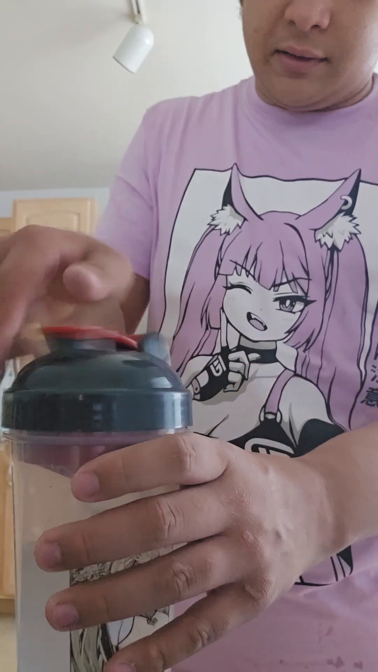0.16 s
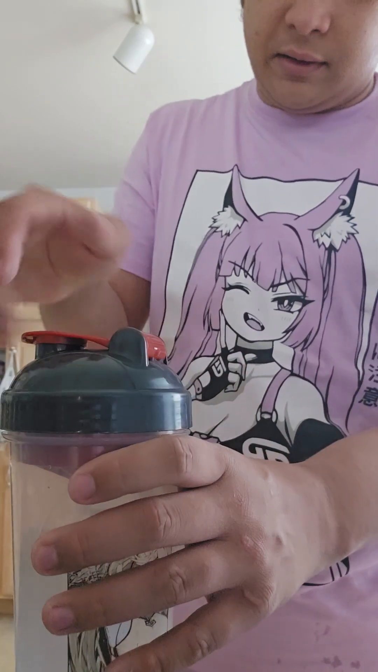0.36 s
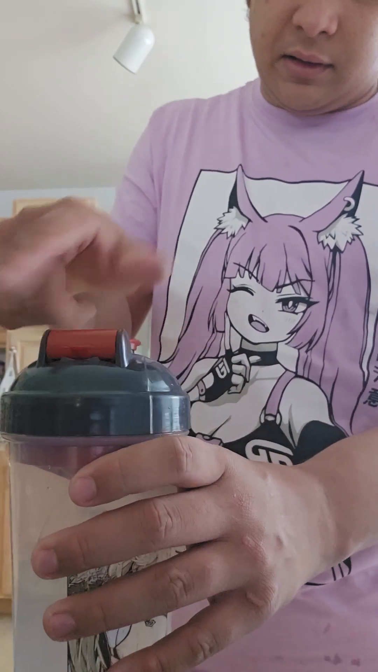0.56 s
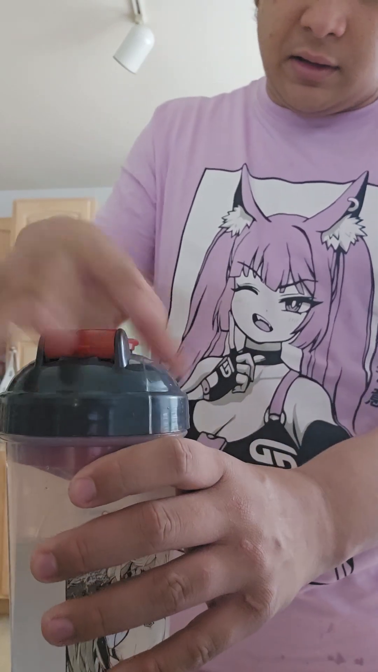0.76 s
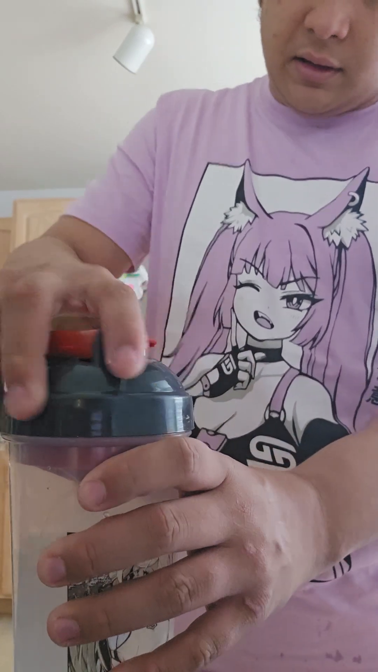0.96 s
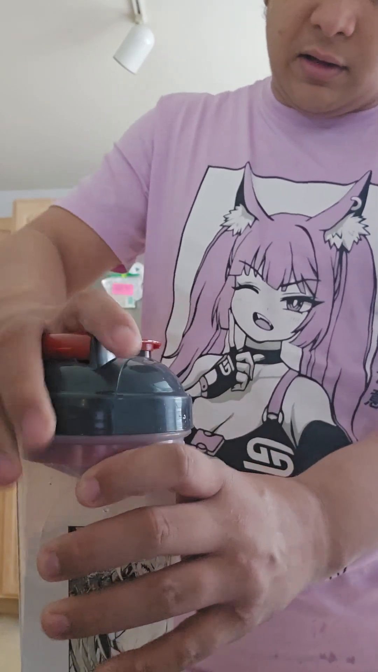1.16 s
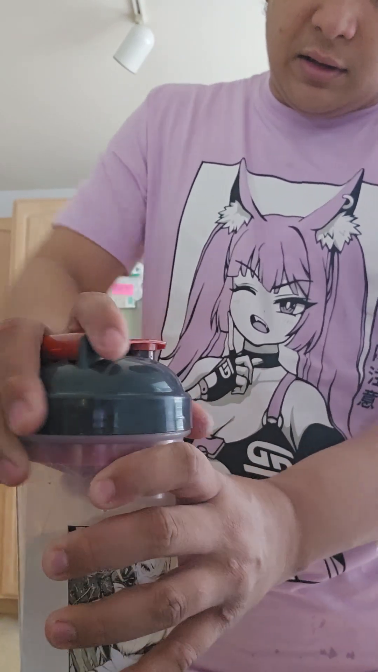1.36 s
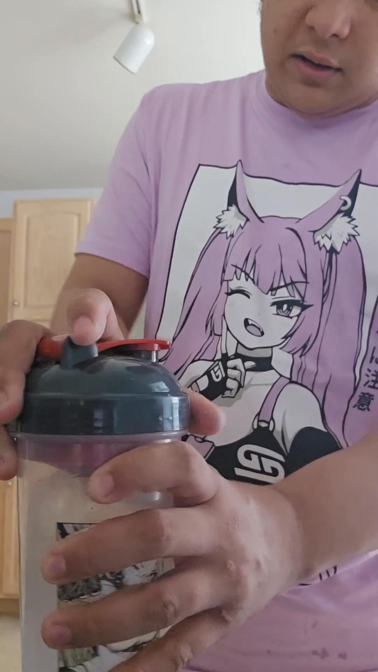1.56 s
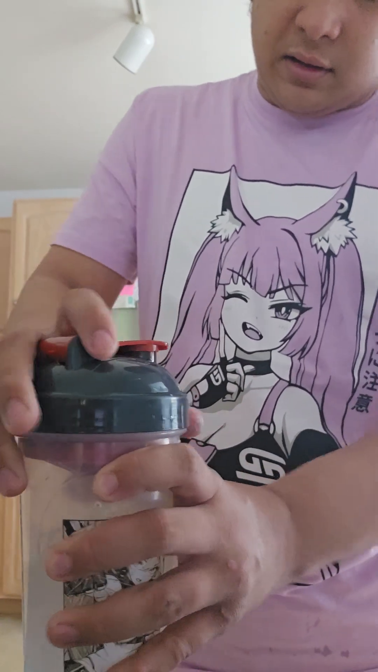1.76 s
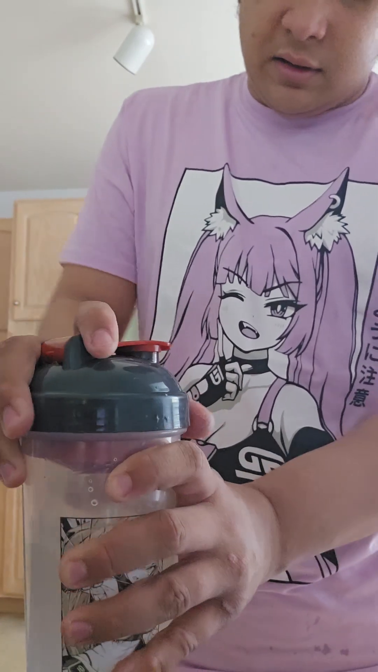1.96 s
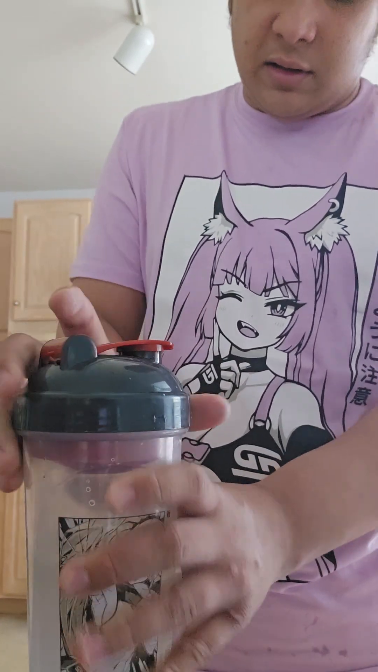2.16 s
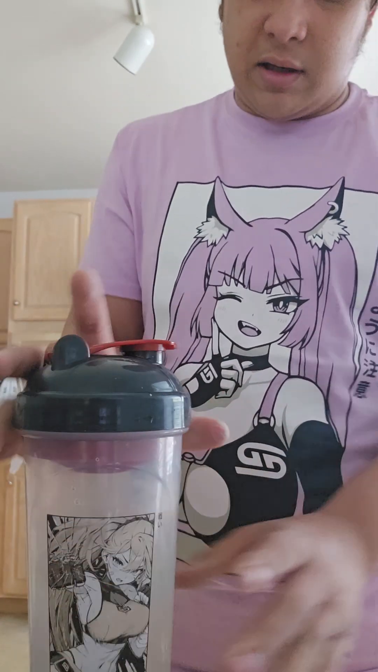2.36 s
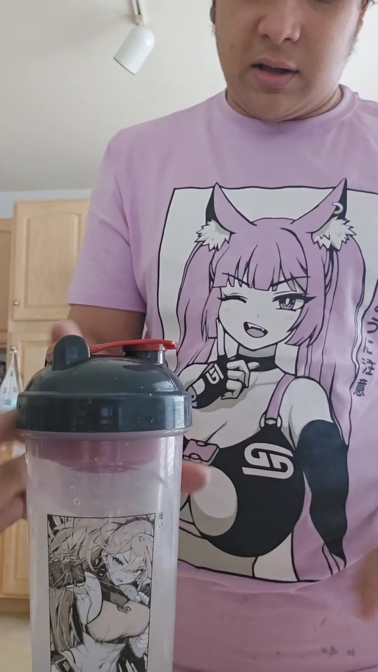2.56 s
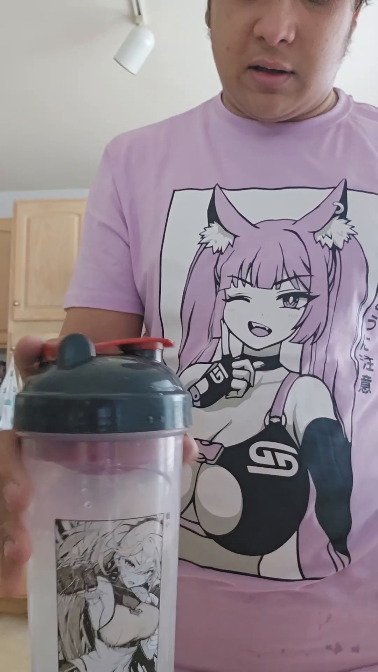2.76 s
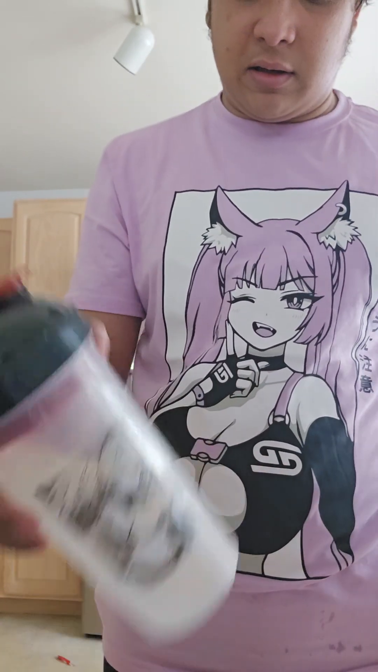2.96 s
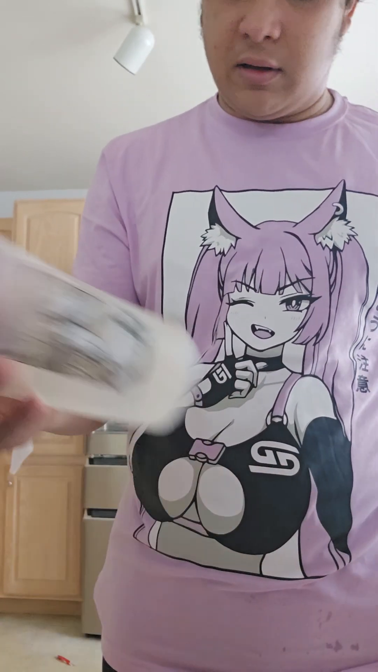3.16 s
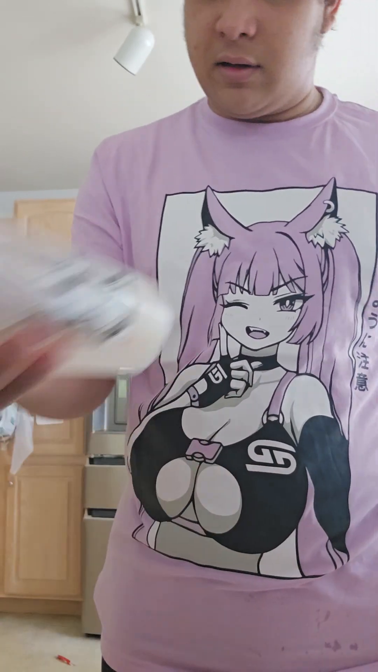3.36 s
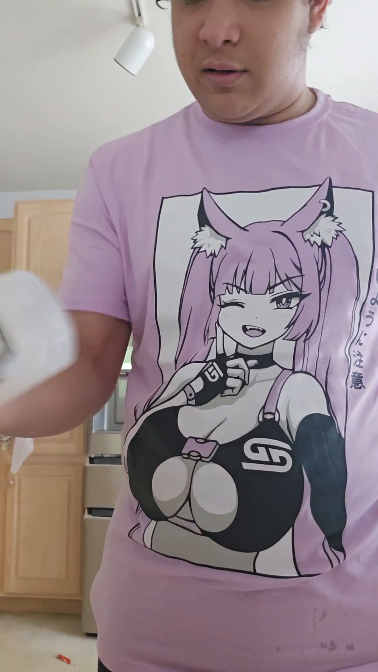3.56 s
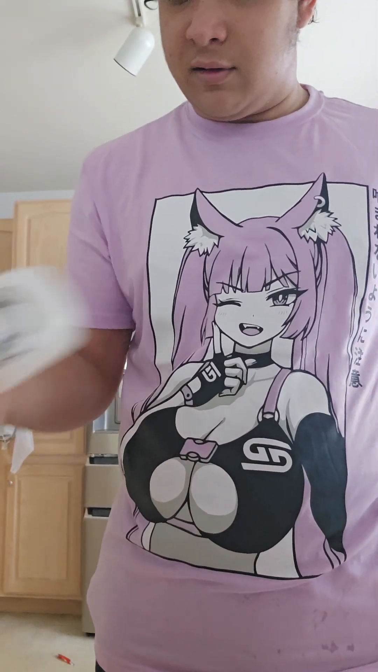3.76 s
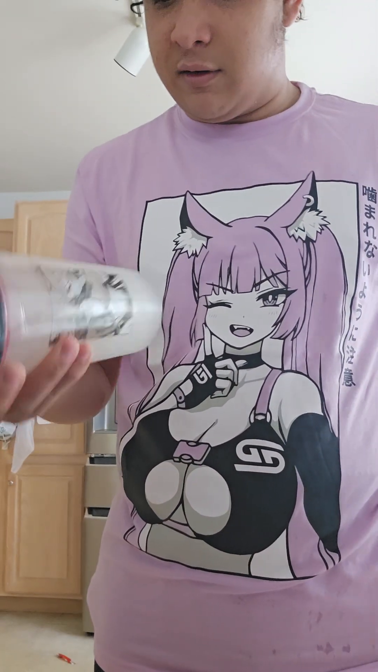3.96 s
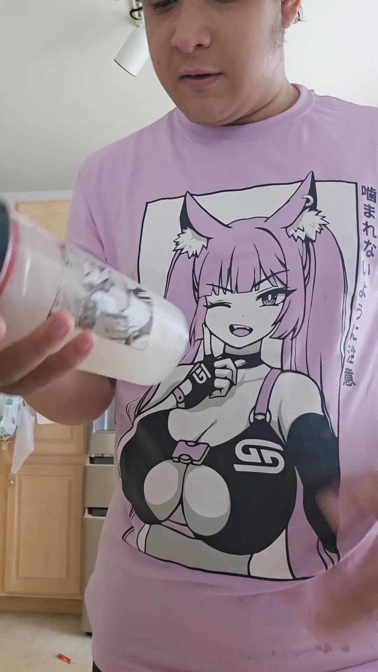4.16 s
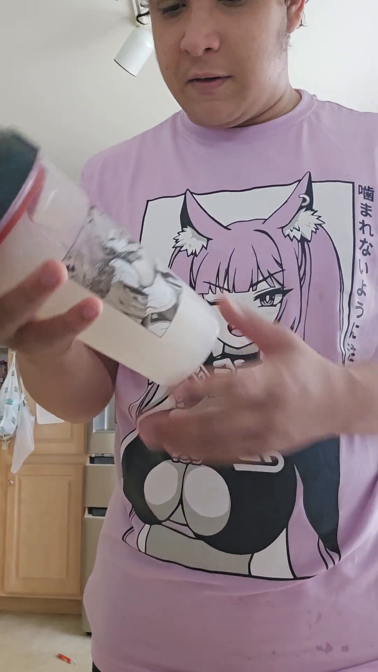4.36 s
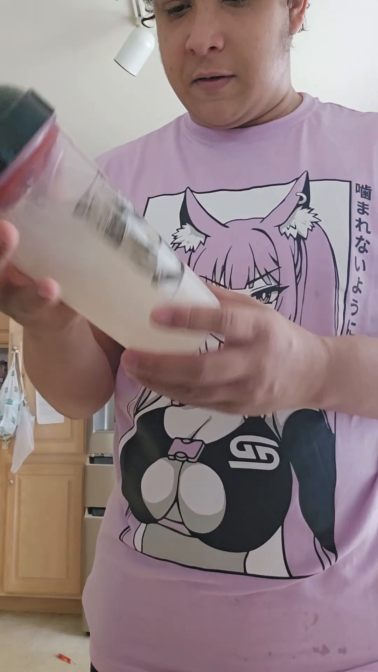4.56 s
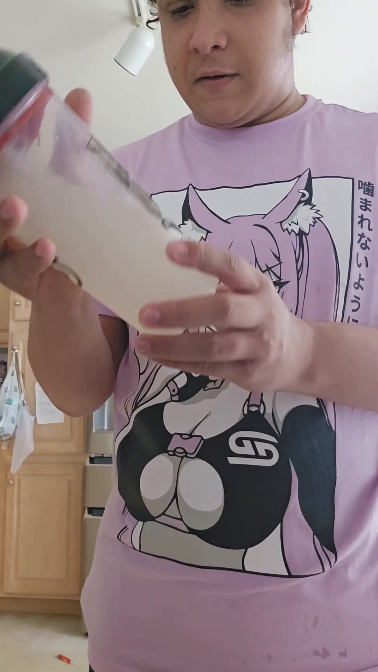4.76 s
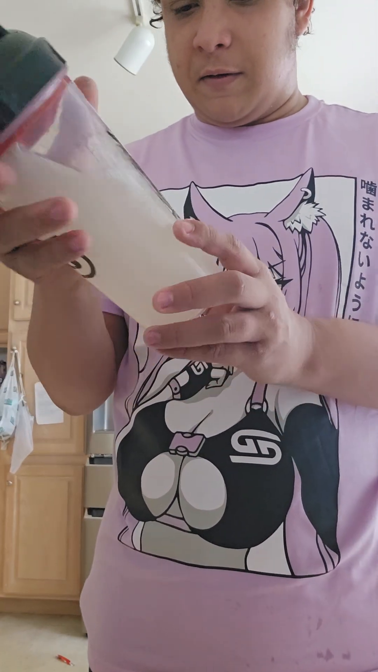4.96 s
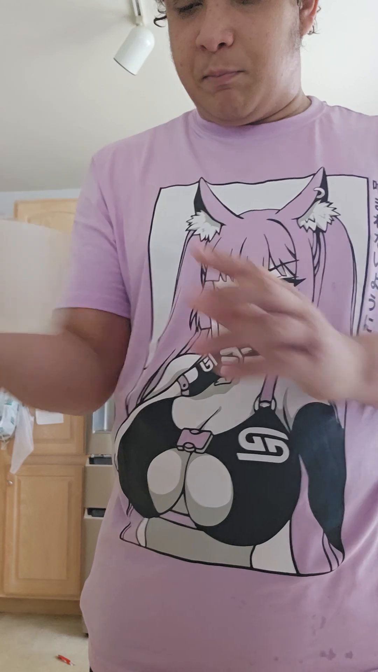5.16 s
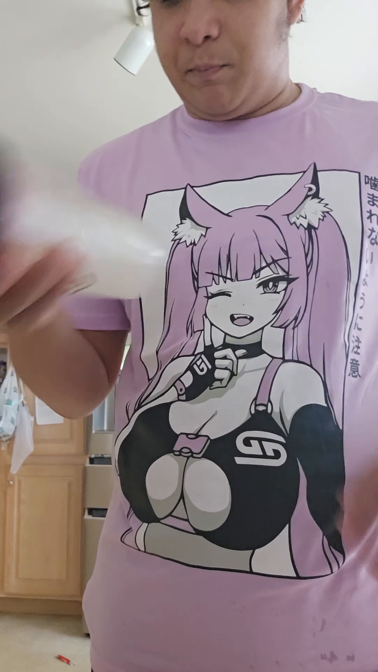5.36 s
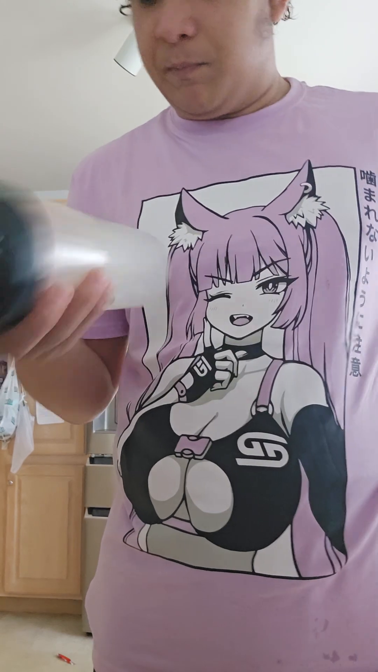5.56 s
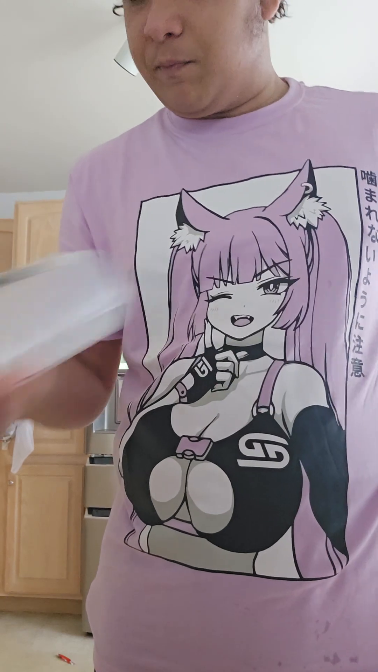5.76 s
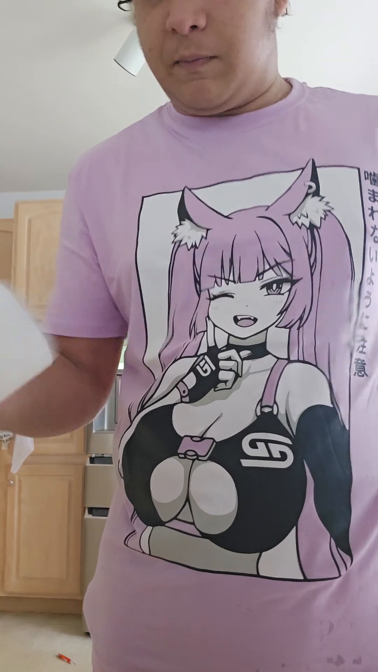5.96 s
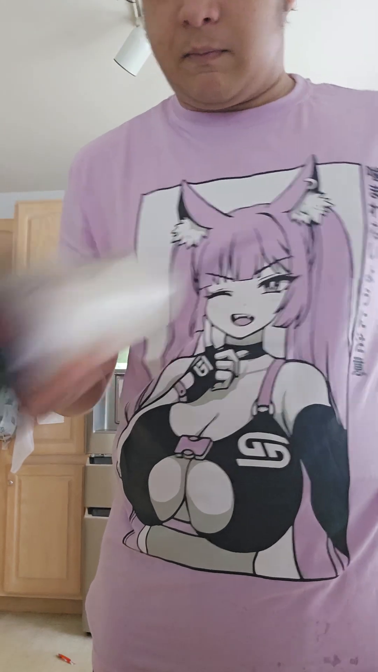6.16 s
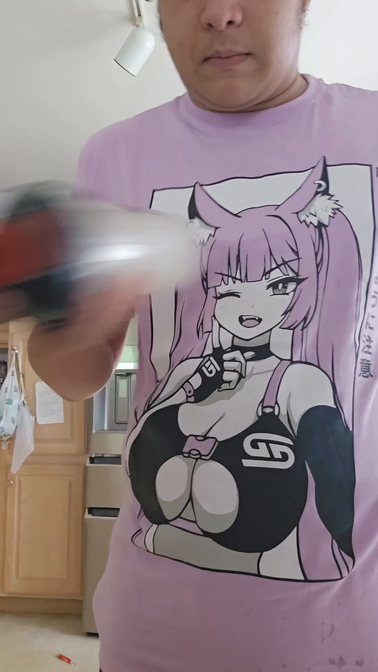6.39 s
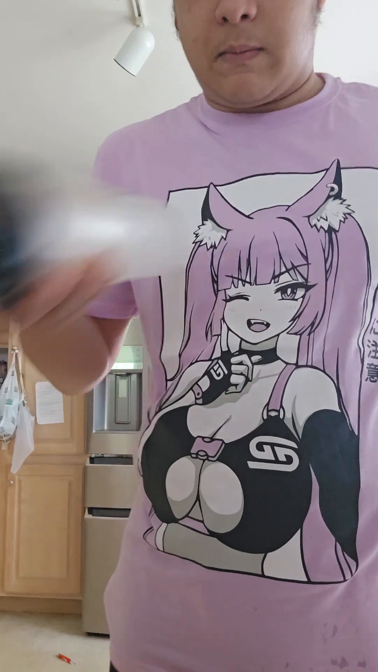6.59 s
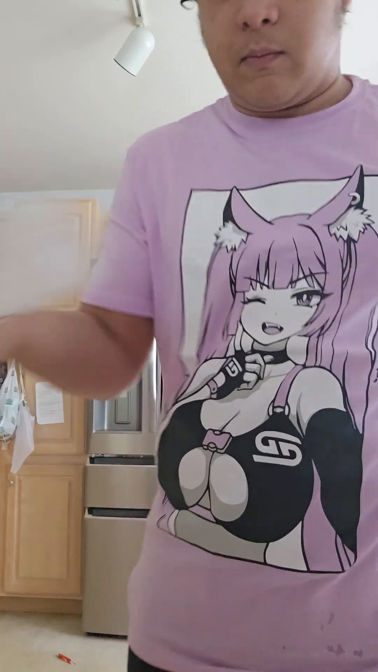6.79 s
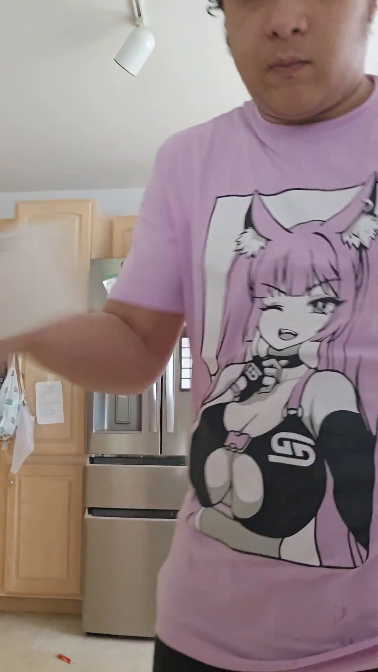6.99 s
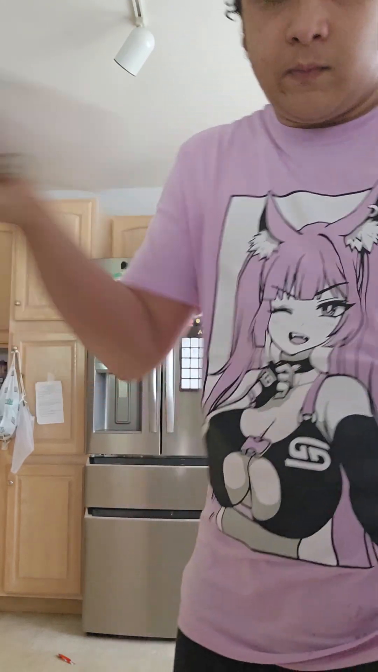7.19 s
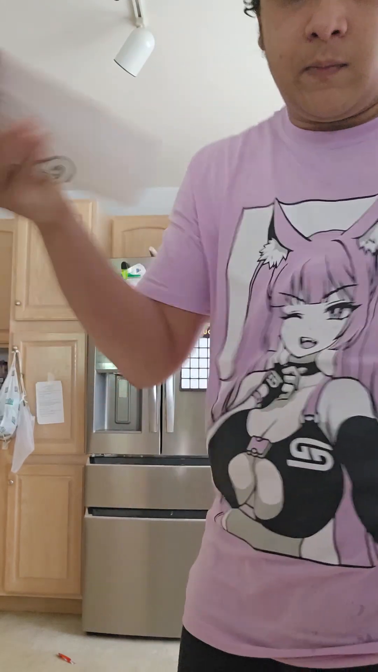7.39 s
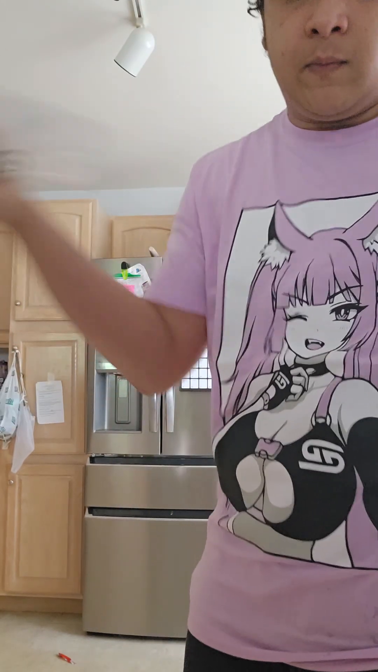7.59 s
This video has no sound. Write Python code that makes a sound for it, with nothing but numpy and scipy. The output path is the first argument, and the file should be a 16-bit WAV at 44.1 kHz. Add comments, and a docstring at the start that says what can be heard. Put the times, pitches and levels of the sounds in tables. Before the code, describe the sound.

Close and dry, with a short kitchen reflection and a barely audible hush. From 0 to 0.3 seconds, plastic lid ticks and scrapes quicken into a hollow clack with a low counter thud; the heaviest clack and thump land near 0.6. Softer knocks come around 0.95 to 1.2, then faint finger rubbing, a tap near 1.75 and small ticks around 2.0 to 2.4. It is almost silent until light taps near 3.2. At 3.4 a very sharp liquid slap opens a short shake, three or four bright, hissing splashes until about 4.2. The drink then drains with a fading, hollow fizz, with small taps at 4.3 and 4.5, nearly silent by 5.2. From 5.3 to the end near 7.6, hard shaking runs steadily, roughly four throws a second, each splash answered by a softer return slosh, with cracks and brief watery gurgles.

```python
"""On a kitchen counter, a plastic shaker cup gets its lid screwed on, then is lifted and shaken; two mic ports listen.
The lid rubs and ticks (noise, tiny slips, hollow resonances) and its jerks thump the counter (low decaying sines).
In the shaken cup the drink slaps the ends (noise bursts), splashes and fizzes (patchy noise, grains, cup resonances)
and gurgles (short tones). A room answer and a faint hush lie around it all."""
import sys
import numpy as np
from scipy import signal
from scipy.fft import rfft, irfft, next_fast_len
from scipy.io import wavfile
from scipy.ndimage import uniform_filter1d, map_coordinates

SR = 44100
rng = np.random.default_rng(int(sys.argv[2]) if len(sys.argv) > 2 else 0)


def generate_wav(signal):
    """Clip the signal to [-1, 1] and save it as 16-bit WAV at the path in sys.argv[1]."""
    frames = np.transpose(np.atleast_2d(signal))
    scaled = np.clip(frames, -1, 1) * 32767
    pcm = np.round(scaled).astype(np.int16)
    wavfile.write(sys.argv[1], SR, pcm)


N = 336483  # length in samples

# Table levels are relative: the layers add their own trims.
# room tone spectrum: f/Hz, level/dB
AIR = [(18, -54), (30, -10.5), (319, 2.5), (395, -5.5), (490, 3), (2000, -42), (2600, -29.5), (5450, -20),
       (9000, -35), (11700, -71), (19800, -120)]
# resting grip on the cup: t/s, rubbing level/dB, hollow rubbing level/dB, counter rumble level/dB
GRIP = [(0, -66, -67, -59), (.14, -70, -60, -49.5), (.34, -70, -62, -43.5), (.55, -82, -79, -65),
        (.7, -64, -58, -49.5), (.88, -74, -89, -66.5), (1.1, -68.5, -64.5, -50), (1.4, -76, -75.5, -60.5),
        (1.95, -86, -75, -61.5), (2.15, -75, -72.5, -58), (2.65, -98, -80, -60), (2.9, -92, -71, -54.5),
        (3.02, -94, -79, -65), (3.36, -90, -98.5, -75), (3.41, -83, -100, -100)]
# the lid's thread gives way in jerks: t/s, hold/s, rubbing level/dB, hollow rubbing level/dB, rumble level/dB
JERKS = [(.162, 0.0054, -51, -38.5, -42), (.2, 0.075, -52, -54, -52), (.25, 0.012, -42, -59.5, -49.5),
         (.272, 0.037, -42.5, -33, -29), (.585, 0.0088, -38.5, -34, -58), (.625, 0.012, -41, -56, -48),
         (.65, 0.002, -33, -40, -36.5), (.903, 0.0018, -72, -47.5, -45), (.958, 0.0099, -54.5, -52.5, -33),
         (1.02, 0.006, -72, -48.5, -47), (1.098, .004, -79, -61, -42), (2.0, 0.03, -83, -68, -44),
         (2.382, .006, -80, -75, -58), (2.93, 0.0053, -83, -51, -45.5)]
JERK_RISE, JERK_SAG, JERK_FALL = 1800, 140, 800  # dB per s
# fingers slide over the plastic: t/s, hold/s, rubbing level/dB, hollow rubbing level/dB, rumble level/dB
SLIDES = [(.97, 0.097, -59.5, -69, -53), (1.195, 0.029, -57.5, -56.5, -53), (1.432, 0.15, -62, -66.5, -71),
          (1.81, 0.044, -66, -84, -59), (1.86, 0.0056, -60, -55.5, -49.5), (2.21, 0.14, -67.5, -83, -77),
          (2.31, 0.28, -72.5, -68.5, -55.5), (2.77, 0.085, -91, -67, -67), (3.1, .01, -74.5, -93, -79)]
SLIDE_RISE, SLIDE_SAG, SLIDE_FALL = 560, 13.3, 490  # dB per s
# ticks: t/s, level/dB, knock level/dB and snap level/dB against it; the lid and fingers tick until 3.3 s, and
# the last two rows are clicks while the cup is held still
TICKS = [(0.053, -39.5, -5, -27), (0.1491, -36, 0, -13), (0.161, -42, 6, -23), (0.188, -32, -5, -23),
         (0.2188, -25.5, -8, -17), (0.2668, -26, 1, -7), (0.3024, -36, 11.5, -22), (0.4094, -54, -18, -8),
         (0.5824, -20, 4.5, -20), (0.5914, -31.5, -12, -23), (0.852, -62, -25, 3), (0.8889, -65, 4, -24),
         (0.9014, -68, 3, -32), (0.9577, -47, 8, -27), (1.0207, -51, 12, -27), (1.1, -76, 0, -20),
         (1.1912, -44.5, -1, -1), (1.746, -39, -14, -14.5), (1.9844, -67, 1, -24),
         (2.0743, -64.5, 18.5, -28), (2.125, -58, -27, -25), (2.175, -51.5, -4, -13),
         (2.1969, -45.5, -36, 5.5), (2.3128, -39, -8.5, -16), (2.379, -55, 9, -25), (2.8674, -67, 14, -39),
         (2.9297, -74, -2.5, -35), (3.1763, -43, -20, -41.5), (3.206, -45, -27, -30.5),
         (3.294, -48, -21.5, -24), (4.2869, -39, 0.5, -7), (4.5284, -44, 7, -37)]
# squeaks of the lid's seal: t/s, length/s, f/Hz, level/dB
SQUEAKS = [(.19, 0.039, 2940, -53), (.22, 0.0082, 3500, -46.5), (.9, 0.023, 2730, -60),
           (2.17, 0.014, 2640, -63)]
# hollow lid resonances: f/Hz, width/Hz, level/dB
LID = [(326, 160, 5.5), (515, 170, 5), (705, 91, 11), (1186, 42, 4.5), (1378, 110, 2), (2470, 500, -7.5),
       (3500, 830, -13.5)]
# jolts through the counter: t/s, level/dB, f/Hz, t60/s
THUMPS = [(0.06, -41, 134, 0.074), (0.162, -22.5, 116, 0.14), (.217, -29.5, 110, .2),
          (0.249, -30, 180, 0.14), (0.304, -13, 167.7, .06), (.588, -7.5, 140.6, 0.034),
          (0.597, -12, 144, 0.081), (.664, -22, 152, 0.062), (.901, -28.5, 129, 0.1),
          (.951, -19.5, 115, 0.09), (.976, -37, 174, 0.06), (1.018, -28, 171.6, 0.12),
          (1.095, -30.5, 114, 0.13), (1.163, -44, 183, 0.083), (1.339, -39, 112, .13),
          (1.376, -34.5, 118, 0.039), (1.576, -46, 156, 0.12), (1.746, -38, 128, .09),
          (1.848, -46, 197, 0.13), (1.886, -38, 178, 0.041), (1.987, -24, 84, 0.04),
          (2.276, -38.5, 123.5, 0.12), (2.319, -39, 127, 0.14), (2.379, -27, 157, 0.074),
          (2.434, -37, 125, 0.092), (2.492, -47, 153, 0.23), (2.767, -40, 134, .16),
          (2.851, -47, 145, 0.088), (2.919, -41, 181, 0.094)]
# counter top resonances: f/Hz, width/Hz, level/dB
COUNTER = [(144.9, 54.3, 3.5), (182.9, 30.6, 2), (344, 97, -14), (57, 113.5, -6)]
# how fast the kitchen's answer dies: f/Hz, t60/s
KITCHEN = [(200, 0.08), (1000, 0.2), (5000, 0.31), (14000, 0.26)]
# the drink slaps a wall: t/s, level/dB, low knock level/dB against it, t60/s (the knock lasts longer)
SLAPS = [(3.4098, 9, -28.5, 0.0049), (3.4157, -2.5, -40.5, 0.0091), (3.5483, -38, -3, 0.013),
         (3.6252, -47, -9, 0.0083), (3.656, -12.5, -17, 0.011), (3.6587, -9.5, -27.5, 0.018),
         (3.9102, -20.5, -14, 0.024), (4.0627, -39, -27, 0.0087), (4.177, -37.5, -23, 0.025),
         (4.1933, -39, -24.5, 0.015), (5.2824, -26.5, -16, 0.0067), (5.2873, -18.5, -27.5, 0.012),
         (5.408, -32, -35, 0.006), (5.4211, -28.5, -24, 0.014), (5.5489, -3.5, -29.5, 0.0084),
         (5.644, -25, -30, 0.0072), (5.693, -31, -13, 0.01), (5.7083, -40, 3.5, 0.0067),
         (5.7887, -30.5, -12, 0.022), (5.9504, -25, -16.5, 0.0092), (6.0384, -17.5, -6.5, 0.0051),
         (6.0453, 6, -31, 0.0064), (6.2218, -26, -10, 0.01), (6.3058, -21, 3, 0.0038),
         (6.3081, -11.5, -19, 0.022), (6.5614, -40, -10, 0.047), (6.571, -1.5, -25, 0.007),
         (6.8391, -2.5, -32, 0.0068), (7.0099, -37, -14, 0.012), (7.077, -18, -38, 0.012),
         (7.0868, -14, -29, 0.017), (7.2519, -22, -47, 0.012), (7.3545, -9, -29, 0.019),
         (7.6162, -11.5, -22, 0.014)]
# cup wall resonances: f/Hz, width/Hz, level/dB (the splash passes through them twice)
CUP = [(500, 750, -6), (1056, 92, 3.5), (1459, 210, 5.5), (1956, 190, 7), (2290, 320, 3.5)]
# air above the settling drink, passed through twice: f/Hz, width/Hz, level/dB
HEADSPACE = [(1410, 90, -2), (1900, 130, -4.5), (2260, 90, 0)]
# air pockets that sing for a moment: t/s, length/s, f/Hz, level/dB
GURGLES = [(3.42, .03, 2430, -36), (3.655, 0.027, 950, -32.5), (3.775, 0.048, 1054, -42.5),
           (3.835, 0.029, 980, -48), (3.975, 0.031, 1440, -45), (4.06, 0.063, 2250, -47),
           (4.068, 0.043, 1029, -48.5), (5.35, .04, 2420, -44), (5.655, 0.068, 1096, -40),
           (5.78, 0.091, 2474, -42), (5.84, 0.028, 1056, -35.5), (6.345, .022, 1087, -36),
           (6.485, 0.026, 527, -44.5), (6.85, 0.068, 1955, -38), (6.86, 0.054, 1011, -44),
           (7.09, 0.014, 1970, -29.5), (7.11, 0.043, 996, -40), (7.48, 0.094, 1437, -47)]
# the drink is thrown into the lid: t/s, hold/s, spray level/dB, hollow slosh level/dB
THROWS = [(3.42, 0.0091, -44, -51), (3.668, 0.041, -33.5, -46.5), (3.918, 0.071, -38, -48),
          (4.195, 0.009, -48.5, -79), (5.29, .002, -62, -67.5), (5.556, 0.047, -34, -43),
          (5.79, 0.073, -36, -42), (6.052, 0.067, -33.5, -48.5), (6.318, 0.066, -33, -47),
          (6.58, 0.079, -35.5, -44.5), (6.848, 0.071, -35, -49), (7.092, 0.08, -36.5, -49.5),
          (7.362, 0.05, -35, -48), (7.612, .05, -35, -59)]
THROW_RISE, THROW_SAG, THROW_FALL = 600, 40, 273  # dB per s
# it runs back to the base: t/s, hold/s, spray level/dB, hollow slosh level/dB
RETURNS = [(3.46, 0.031, -47, -63), (3.547, 0.12, -40, -52), (3.79, 0.06, -43, -71),
           (4.075, 0.037, -47, -68), (5.345, 0.018, -38, -59.5), (5.45, 0.059, -40, -47),
           (5.696, 0.098, -42, -56), (5.954, 0.07, -41, -47), (6.228, 0.086, -41, -54),
           (6.496, 0.027, -39, -49), (6.768, 0.021, -39, -45), (7.018, 0.041, -40, -51.5),
           (7.267, 0.053, -41.5, -47.5), (7.507, 0.0067, -39, -45.5), (7.59, 0.009, -38.5, -58)]
RETURN_RISE, RETURN_SAG, RETURN_FALL = 320, 47, 310  # dB per s
SLOSH_SAG, SLOSH_FALL = 150, 240  # hollow slosh of both strokes, dB per s
# drops fall back while the cup is held still: t/s, hold/s, spray level/dB, hollow slosh level/dB
DROPS = [(4.29, .002, -58.5, -62), (4.53, 0.0021, -56, -48), (4.7, .004, -63, -71.5),
         (4.752, .01, -66, -65), (4.99, 0.0019, -70, -78.5)]
DROP_RISE, DROP_FALL = 790, 1000  # dB per s
# foam drains between the bouts: t/s, fizz level/dB, hollow slosh level/dB, deep slosh level/dB,
# headspace ring level/dB against the splash, slosh pitch f/Hz (blends two fixed resonances)
DRAIN = [(3.385, -88.5, -96, -97, -42, 557), (3.408, -60, -74, -68, -44, 520),
         (3.95, -51.5, -65, -78, -23, 573), (4.1, -60, -68, -66, -7, 565), (4.46, -63, -65, -66, -4, 568),
         (4.68, -70.5, -66.5, -75.5, -13.5, 560), (4.93, -78.5, -75, -94.5, -13, 510),
         (5.2, -90.5, -92, -82.5, -18.5, 300), (5.255, -89.5, -86.5, -89.5, -24.5, 300),
         (5.275, -68, -75, -78.5, -28, 399), (5.33, -54, -72, -63, -37, 547)]
# low slosh against the spray, its random swing, and the pace of that swing
DEEP_DB, DEEP_SWAY_DB, DEEP_SWAYS_PER_S = -17.5, 2.5, 25
# microphone ports: f/Hz, level/dB, left minus right level/dB
PORTS = [(24.6, -11, -9.5), (70.5, -5, -2), (207, 5, 1.5), (794, 3, -2.5), (1720, 3, 4), (2580, 3.5, 1),
         (3610, 3.5, -3), (5200, 11, -11), (6450, -4, 17.5), (7550, 3, -7.5), (8150, -8, 13),
         (10100, -16, 21), (12020, -7.5, -18.5), (13400, -9, -2.5)]
TOP_HZ = 15900  # middle of the upper band edge


def amp(db):
    """Decibels to linear gain."""
    return 10 ** (np.asarray(db) / 20)


def unit(x):
    """x scaled to an rms of 1."""
    return x / np.sqrt(np.mean(x ** 2) + 1e-20)


def along(f, v, hz):
    """Read the curve v over f at hz, on a log frequency axis."""
    return np.interp(np.log(hz + 1), np.log(np.asarray(f) + 1), v)


def curves(tables):
    """One value per sample for each column after the time."""
    s, *cols = np.transpose(np.concatenate(tables))
    return [np.interp(np.arange(N) / SR, s, c) for c in cols]


def together(*levels_db):
    """Level of several sounds at once, adding their powers."""
    return 10 * np.log10(sum(amp(db) ** 2 for db in levels_db))


def swells(rows, rise, sag, fall):
    """Level curves in dB: each row (t, hold, levels..) climbs to its peak, sags through its hold and falls."""
    s, hold, *levels = np.transpose(rows)[:, :, None]
    t = np.arange(0, N, 32) / SR
    late = t - s
    loss = rise * np.maximum(-late, 0)
    loss = loss + sag * np.clip(late, 0, hold)
    loss = loss + fall * np.maximum(late - hold, 0)
    loss = np.minimum(loss, 150)  # dB, keeps the log finite
    return np.array([np.interp(np.arange(N) / SR, t, together(*(db - loss))) for db in levels])


def filtered(x, response):
    """x through a complex response of frequency."""
    m = 2 * next_fast_len(N // 2 + 8192)  # padding for the ring-out
    return irfft(rfft(x, m) * response(np.fft.rfftfreq(m, 1 / SR)), m)[..., :N]


def body(modes):
    """Response of a resonant body: band-pass modes (f, width, dB) summed with alternating sign."""
    def response(f):
        total = 0
        for k, (center, width, db) in enumerate(modes):
            damping = 1j * f * width
            total = total + (-1) ** k * amp(db) * damping / (center * center - f * f + damping)
        return total
    return response


def above(hz):
    """Second-order high-pass."""
    return lambda f: (1j * f / (hz + 1j * f)) ** 2


def brightened(x, treble_db):
    """x with its treble above about 7 kHz raised or lowered."""
    treble = signal.sosfiltfilt(signal.butter(2, 7000, "high", fs=SR, output="sos"), x)
    return x + (amp(treble_db) - 1) * treble


def grains(count, mid_hz, octaves, cycles, spread_db, rise):
    """A steady rain of damped sines at random pitches, a few of them large; rise bends the pitch up. Rms 1."""
    u, t = rng.random((count, 2)), np.arange(400) / SR
    hz = np.clip(mid_hz * 2 ** (octaves * rng.standard_normal((count, 1))), 200, 16000)
    turns = hz * t
    wave = np.sin(2 * np.pi * turns * (1 + rise * turns / cycles))
    wave *= np.exp(-turns / cycles) * (1 - np.exp(-2 * turns))
    rarity = -np.log(u[:, 1:] + .01)
    wave *= amp(spread_db * rarity) * np.hanning(2 * len(t))[len(t):]  # fade out the cut end
    where = (u[:, :1] * N).astype(int) + np.arange(len(t))
    return unit(np.bincount(where.ravel(), wave.ravel(), minlength=N)[:N])


def patchy(depth_db, apart):
    """Noise at both ports with short patches of random gain; apart sets each port's own share. Rms 1."""
    shared, left, right = rng.standard_normal((3, N))
    z = signal.stft(shared + apart * np.array([left, right]), nperseg=256)[2]
    field = uniform_filter1d(rng.standard_normal(z.shape[1:]), size=4, axis=0)  # over frequency
    field = uniform_filter1d(field, size=5, axis=1)  # over time
    return unit(signal.istft(z * amp(depth_db * unit(field)), nperseg=256)[1][:, :N])


def bursts(rows, attack, apart):
    """Decaying noise bursts (t, dB, t60) with a rounded rise (attack in s); each port hears a share of its own."""
    out, t = np.zeros((2, N + SR)), np.arange(SR // 10) / SR
    for s, db, t60 in rows:
        shape = amp(db - 60 * t / max(t60, .002)) * (1 - np.exp(-(t / attack) ** 2))
        shared, left, right = rng.standard_normal((3, len(t)))
        noise = unit(shared + apart * np.array([left, right]))
        out[:, round(s * SR):][:, :len(t)] += shape * noise
    return out[:, :N]


def tones(rows):
    """Brief sines that swell and fade, broken up by a fast random flutter."""
    out = np.zeros(N + SR)
    for s, length, hz, db in rows:
        u = np.linspace(0, 1, round(length * SR))
        flutter = np.interp(u * length, np.arange(20) * .0045, rng.standard_normal(size=20))
        envelope = amp(db) * (0.25 + 0.84 * flutter) * np.sin(np.pi * u) ** 0.37
        out[round(s * SR):][:len(u)] += envelope * np.sin(2 * np.pi * hz * u * length)
    return out[:N]


def room_tone():
    """A faint low hush: shaped noise, partly shared by both ports."""
    a, b = rng.standard_normal((2, N))
    hush = filtered(np.array([a + .5 * b, a - .5 * b]), lambda f: amp(along(*np.transpose(AIR), f)))
    return amp(-81.0) * unit(hush)


def hands():
    """Rubbing, hollow rubbing and rumble in dB: the grip with jerks and slides on top."""
    jerks = swells(JERKS, JERK_RISE, JERK_SAG, JERK_FALL)
    slides = swells(SLIDES, SLIDE_RISE, SLIDE_SAG, SLIDE_FALL)
    return together(np.array(curves([GRIP])), jerks, slides)


def lid():
    """Thread and fingers rub in fine slips, brighter when firm; ticks crack, snap and knock the hollow lid."""
    rub_db, hollow_db, _ = hands()
    slips = grains(count=6000, mid_hz=4150, octaves=0.95, cycles=0.62, spread_db=6.5, rise=0)
    skin = patchy(depth_db=2.5, apart=.9) + .2 * slips
    rub = unit(filtered(skin, above(680)))
    rub = brightened(rub, treble_db=1 + 0.25 * (rub_db + 53.5))
    hollow = unit(filtered(patchy(depth_db=3, apart=0.9), body(LID)))

    crack_rows = [(s, db - 5.5, .008) for s, db, _, _ in TICKS]
    snap_rows = [(s, db + snap_db + 14.0, .006) for s, db, _, snap_db in TICKS]
    knock_rows = [(s, db + knock_db + 14.0, .012) for s, db, knock_db, _ in TICKS]
    crack = filtered(bursts(crack_rows, attack=0.0015, apart=0.2),
                     lambda f: above(1200)(f) / (1 + 1j * f / 7000))
    snap = filtered(bursts(snap_rows, attack=0.00074, apart=0.95), above(5500))
    knock = filtered(bursts(knock_rows, attack=0.002, apart=0.21), body(LID))
    rubbing = amp(rub_db - 3.5) * rub + amp(hollow_db - 2.5) * hollow
    return rubbing + crack + snap + knock + tones(SQUEAKS)


def counter():
    """Each jolt rings the counter top for a few low cycles; the hands' rumble is noise through its resonances."""
    thumps, t = np.zeros(N + SR), np.arange(SR // 3) / SR
    for s, db, hz, t60 in THUMPS:
        swell = amp(db + 2.5 - 60 * t / max(t60, .01)) * (1 - np.exp(-t / 0.0027))
        thumps[round(s * SR):][:len(t)] += swell * np.sin(2 * np.pi * hz * t)
    rumble_db = hands()[2]
    rumble = unit(filtered(patchy(depth_db=-1.0, apart=0.31), body(COUNTER)))
    return thumps[:N] + amp(rumble_db + 3.0) * rumble


def kitchen(x):
    """Noise tails whose frequencies die at their own speeds; they differ by port and are redrawn as time goes on."""
    out, hop = np.zeros((2, N + SR)), SR // 8  # a fresh tail for every eighth of a second
    for start in range(0, N, hop):
        hz, t, z = signal.stft(rng.standard_normal((2, SR // 3)), SR, nperseg=256)
        decay = amp(-60 * t / along(*np.transpose(KITCHEN), hz)[:, None])
        tail = signal.istft(z * decay, SR, nperseg=256)[1]
        wet = signal.fftconvolve(x[None, start:start + hop], tail / np.linalg.norm(tail[0]), axes=1)
        out[:, start + 150:][:, :wet.shape[1]] += wet  # 150 samples of pre-delay
    return out[:, :N]


def sloshing():
    """Levels in dB: spray of the strokes alone, spray with drops, hollow slosh with drops."""
    drops = swells(DROPS, DROP_RISE, 0, DROP_FALL)
    throw_spray = swells(THROWS, THROW_RISE, THROW_SAG, THROW_FALL)[0]
    return_spray = swells(RETURNS, RETURN_RISE, RETURN_SAG, RETURN_FALL)[0]
    throw_slosh = swells(THROWS, THROW_RISE, SLOSH_SAG, SLOSH_FALL)[1]
    return_slosh = swells(RETURNS, RETURN_RISE, SLOSH_SAG, SLOSH_FALL)[1]
    strokes = together(throw_spray, return_spray)
    return strokes, together(strokes, drops[0]), together(throw_slosh, return_slosh, drops[1])


def drink():
    """Slaps on the wall, with spray, bursting foam and larger bubbles, and the ring of the cup and the air in it."""
    fizz_db, drain_db, drain_deep_db, ring_db, slosh_hz = curves([DRAIN])
    stroke_db, spray_db, slosh_db = sloshing()
    splash_db = together(spray_db, fizz_db)
    hollow_db = together(slosh_db, drain_db)
    sway = map_coordinates(rng.standard_normal(size=400), [np.arange(N) / SR * DEEP_SWAYS_PER_S])
    deep_db = together(stroke_db + DEEP_DB + DEEP_SWAY_DB * sway, drain_deep_db)

    # hard splashing is bright; in quiet draining the cup's ring takes a larger share
    force = np.clip(splash_db + 30, -30, 12)
    spray = grains(count=7000, mid_hz=4000, octaves=.9, cycles=2.2, spread_db=4, rise=0)
    bubbles = grains(count=3500, mid_hz=1700, octaves=.6, cycles=4, spread_db=1.6, rise=.04)
    foam = patchy(depth_db=2.2, apart=.95)
    fizz = brightened(unit(filtered(foam + 0.26 * spray, above(960))), treble_db=0.33 * force)
    wall = unit(filtered(patchy(depth_db=7.0, apart=1.0), lambda f: body(CUP)(f) ** 2))
    headspace = unit(filtered(patchy(depth_db=-2.0, apart=0.72), lambda f: body(HEADSPACE)(f) ** 2))
    splash = fizz + amp(-8 - 0.07 * force) * wall + amp(-10.5) * bubbles + amp(ring_db) * headspace

    # the hollow slosh crossfades from a high to a low resonance as its pitch curve sinks
    high = unit(filtered(patchy(depth_db=4.0, apart=0.27), lambda f: body([(545, 430, 0)])(f) ** 2))
    low = unit(filtered(patchy(depth_db=4.0, apart=0.27), lambda f: body([(298, 160, 0)])(f) ** 2))
    sunk = np.clip((560 - slosh_hz) / 260, 0, 1)
    hollow = np.sqrt(1 - sunk) * high + np.sqrt(sunk) * low
    deep_body = body([(60, 60, -2), (135, 70, 0), (185, 60, -3)])
    deep = unit(filtered(patchy(depth_db=4.5, apart=0.14), lambda f: deep_body(f) * 300 / (300 + 1j * f)))

    crack_rows = [(s, db + 0.5, t60) for s, db, _, t60 in SLAPS]
    knock_rows = [(s, db + low_db + 23.0, 1.315 * t60) for s, db, low_db, t60 in SLAPS]
    crack = filtered(bursts(crack_rows, attack=0.0013, apart=1.0), above(740))
    knock = filtered(bursts(knock_rows, attack=0.0014, apart=1.0), body(CUP))
    wash = amp(splash_db - 1.5) * splash + amp(hollow_db - 4.5) * hollow + amp(deep_db) * deep
    return wash + crack + knock + tones(GURGLES)


def placed(x, lag_ms):
    """The sound reaches the left port a little after the right."""
    half_turn = np.array([[1], [-1]])  # left late, right early by half the lag
    return filtered(x, lambda f: np.exp(-1j * np.pi * f * lag_ms / 1000 * half_turn))


def scene():
    """Lid, counter and drink, each placed between the ports, plus the kitchen's answer and the hush."""
    top, base, cup = lid(), counter(), drink()
    direct = placed(top, lag_ms=.06) + placed(cup, lag_ms=0.29)
    direct += placed(base, lag_ms=0.72) * amp([[-1.2], [1.2]])  # counter leans right
    send = (amp(-9) * top + amp(-7) * cup + amp(-6.0) * base).mean(axis=0)
    return direct + kitchen(send) + room_tone()


def record(dry):
    """Colour each port with its own cavity resonances (minimum phase), round off peaks, limit the band."""
    f, db, side_db = np.transpose(PORTS)
    hz = np.fft.rfftfreq(2048, 1 / SR)
    gain = amp([along(f, db + side_db / 2, hz), along(f, db - side_db / 2, hz)])
    # folding the cepstrum forward makes the filter minimum phase
    cepstrum = irfft(np.log(gain))
    cepstrum[:, 1:1024] *= 2
    cepstrum[:, 1025:] = 0
    port_response = irfft(np.exp(rfft(cepstrum)))
    heard = signal.fftconvolve(dry, port_response, axes=1)[:, :N]
    heard = heard / (1 + np.abs(heard / .95) ** 6) ** (1 / 6)  # soft ceiling at .95
    return filtered(heard, lambda f: np.clip((TOP_HZ - f) / 250 + .5, 0, 1) ** 2)


dry = scene()
out = record(dry)
generate_wav(out)
```